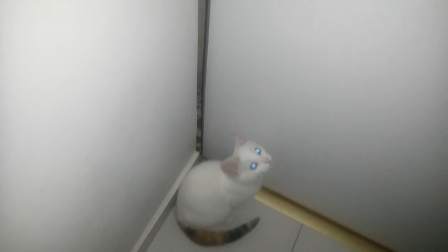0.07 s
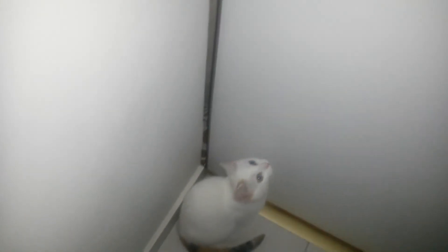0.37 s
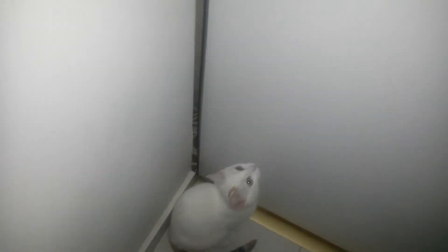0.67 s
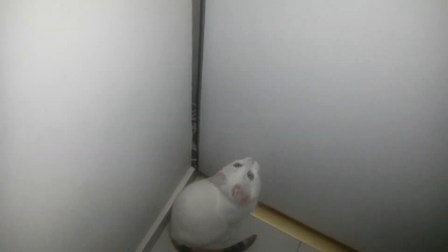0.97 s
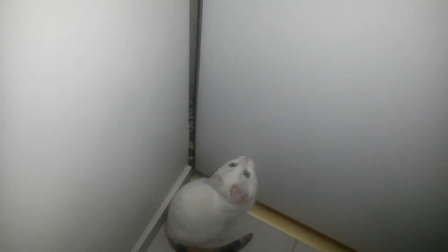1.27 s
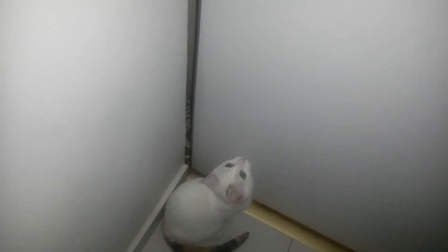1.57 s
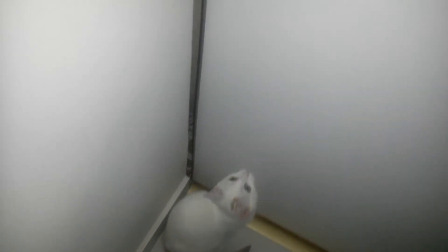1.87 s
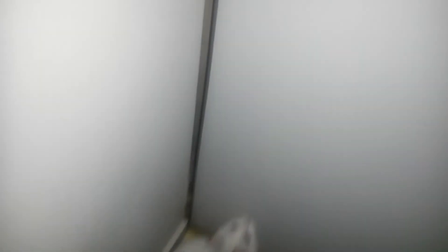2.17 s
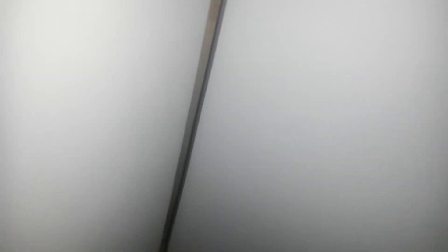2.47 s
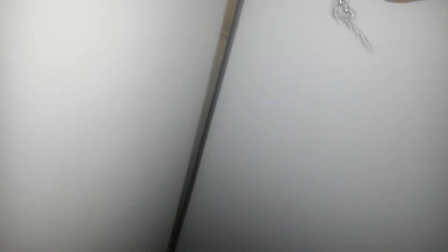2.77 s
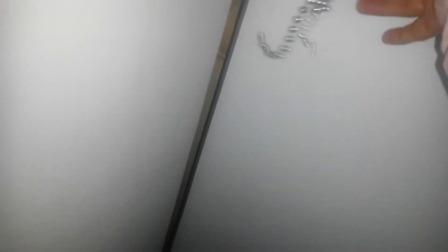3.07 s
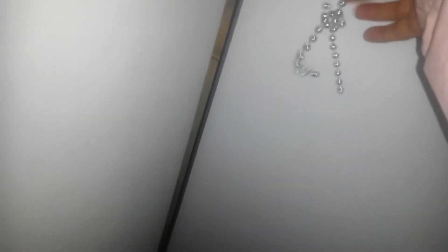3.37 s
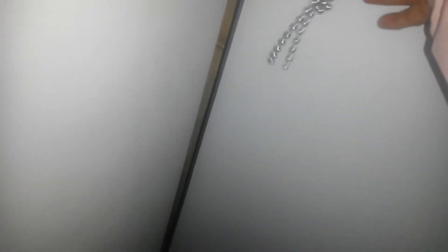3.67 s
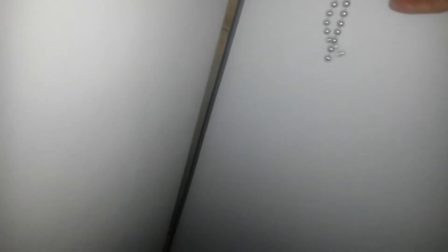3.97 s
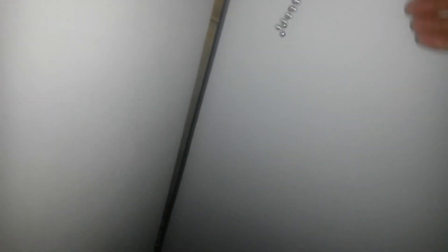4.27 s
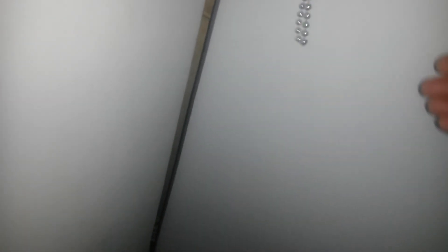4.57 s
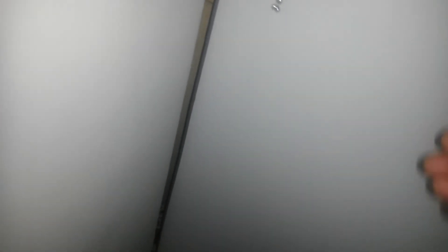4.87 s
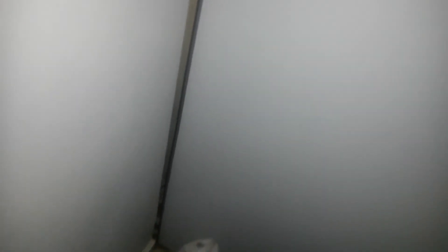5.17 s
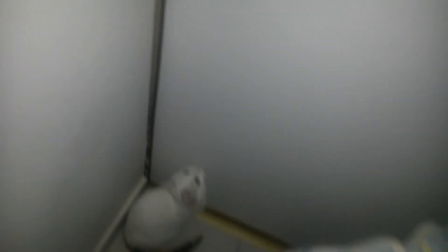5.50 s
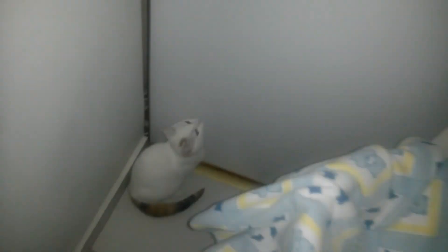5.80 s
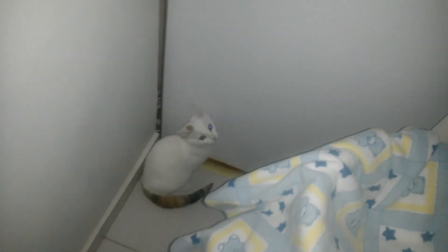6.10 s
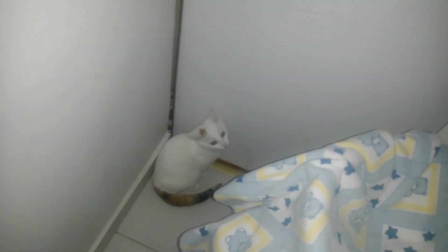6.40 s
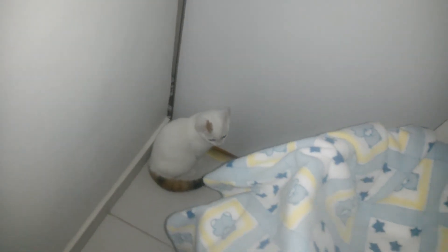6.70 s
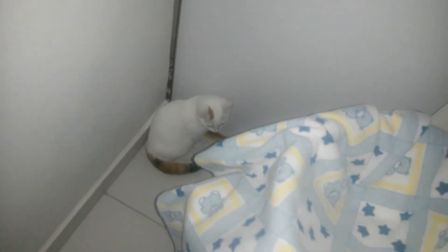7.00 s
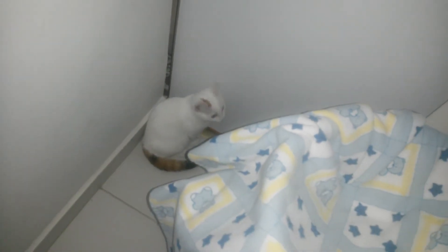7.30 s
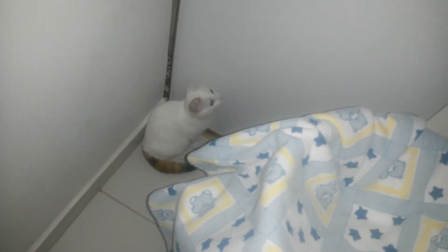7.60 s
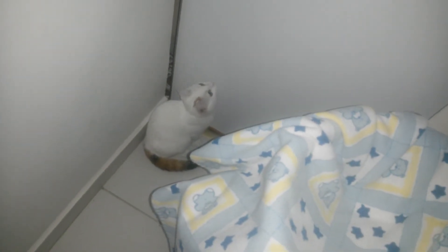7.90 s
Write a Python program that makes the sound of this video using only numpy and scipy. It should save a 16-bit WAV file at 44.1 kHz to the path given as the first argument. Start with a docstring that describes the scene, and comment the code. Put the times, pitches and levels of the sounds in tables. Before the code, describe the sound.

In a small room with hard walls, a brief rustle and a hand dragging on a door lead into sharp, irregular rattling of beads against the panel. Dull knocks make the hollow door shudder in its frame underneath the clatter. About halfway through, the rattling stops, leaving a few stray clicks, then soft fabric hiss and muffled handling bumps close to the phone microphone.

```python
"""Cloth rustles and thumps softly close to a phone, and a hand drags on and bumps a hollow door.
A dangling string of beads is flicked against the door in a small hard-walled room: each impact
excites the brief, high modes of the beads and the longer, lower modes of the panel. The beads click,
tumble and slide, then hang nearly still while friction makes the cloth hiss as the phone moves away."""
import sys
import numpy as np
from scipy import signal
from scipy.fft import rfft, irfft
from scipy.io import wavfile

SR = 44100
rng = np.random.default_rng(int(sys.argv[2]) if len(sys.argv) > 2 else 0)


def write(x):
    x = np.atleast_2d(x).T
    wavfile.write(sys.argv[1], SR, np.round(np.clip(x, -1, 1) * 32767).astype(np.int16))


N = 355005

# soft bumps of the hand on the door: t/s, thud level/dB, rattle level/dB
DOOR_BUMPS = [(.385, -20.5, -22), (.688, -7, -3.5), (.858, -24, -31), (1.014, -14, -3.5), (1.307, -16, -8),
              (1.508, -13, -5), (1.601, -13.5, -18.5), (1.725, -15.5, -27), (1.967, -16, -8.5),
              (2.148, -13, -5.5), (2.436, -5, -5), (2.6802, -2, 1), (2.862, -15, -4), (3.208, -7, -2),
              (3.397, -9.5, -1.5), (3.745, -17.5, -17)]
# spectrum of the rumble of fingers and door leaf: f/Hz, level/dB
RUMBLE_SPECTRUM = [(20, -20), (45, 0), (80, 2), (170, -5), (300, -15.5), (750, -18), (1500, -40),
                   (5000, -71)]


def undb(db):
    """Amplitude grows tenfold for every 20 dB."""
    return 10 ** (np.asarray(db) / 20)


def unit(x):
    """Normalisation: the energy of each channel becomes one."""
    return x / np.sqrt(np.sum(x ** 2, axis=-1, keepdims=True) + 1e-18)


def clock(seconds):
    """Uniform sampling: the sample times, t/s."""
    return np.arange(int(seconds * SR)) / SR


def curve(rows):
    """Linear interpolation between (t/s, value) rows."""
    return np.interp(np.arange(N) / SR, *np.transpose(rows))


def add(track, s, x):
    """Superposition: x joins the track at s seconds."""
    i = int(s * SR)
    track[..., i:i + x.shape[-1]] += x[..., :max(N - i, 0)]


def convolve(x, response):
    """A linear system convolves its input with its impulse response."""
    x, response = np.atleast_2d(x, response)
    return signal.oaconvolve(x.astype("float32"), response.astype("float32"), axes=-1)[:, :N]


def edge(x, hz, kind, order=2):
    """Maximally flat low-, high- or band-pass filtering."""
    return signal.lfilter(*signal.butter(order, hz, kind, fs=SR), x + 1e-18)


def colour(x, points, size=4096):
    """Minimum-phase filtering through (f/Hz, level/dB) points, by folding the cepstrum."""
    hz, db = np.transpose(points)
    f = np.maximum(np.arange(size // 2 + 1) * SR / size, 1)
    gain = undb(np.interp(np.log(f), np.log(hz), db))
    cepstrum = irfft(np.log(gain))
    cepstrum[1:size // 2] *= 2
    cepstrum[size // 2 + 1:] = 0
    return convolve(x, irfft(np.exp(rfft(cepstrum))))


def noise(points, apart_hz):
    """Stereo noise of rms one, coherent between the channels well below apart_hz."""
    mid, side = rng.standard_normal((2, N), dtype="float32")
    side = edge(side, apart_hz, "highpass", order=1)
    x = colour(np.array([mid + side, mid - side]), points)
    return x / x.std()


def damping(t, t60):
    """Exponential decay: the level falls 60 dB in t60 seconds."""
    return np.exp(-np.log(1000) * t / t60)


def cloth(flicker_db=1, grain_db=2.2):
    """Stick-slip friction: fibres catch and let go in a fine-grained hiss."""
    # first rub, faint steady hiss under the clatter of the beads, later rubs: t/s, level/dB
    first_rub = [(0.0, -51.5), (0.292, -45.5), (0.608, -56), (0.66, -56)]
    faint_hiss = [(.8, -60), (4.1, -62.5)]
    later_rubs = [
        [(4.58, -63), (4.768, -62), (4.968, -54.5), (5.738, -49), (5.866, -59.5), (6.234, -57), (6.312, -64.5),
         (6.42, -69.5)],
        [(6.5, -66), (6.59, -52), (6.65, -59), (6.832, -60), (6.892, -69.5), (6.996, -66.5), (7.734, -87.5),
         (8.05, -98)],
    ]
    # spectrum of the hiss: f/Hz, level/dB
    spectrum = [(60, -10.5), (150, 4.5), (450, 0.5), (1200, 0), (2500, 1), (5000, -3.5), (8000, -1.5),
                (14000, -2)]
    knots = np.linspace(0, N, 400)
    flicker = np.interp(np.arange(N), knots, rng.standard_normal(len(knots)))
    grain = undb(grain_db * rng.exponential(size=N))
    grain /= np.sqrt(np.mean(grain ** 2))
    level_db = curve(np.vstack([first_rub, faint_hiss, *later_rubs])) + flicker_db * flicker
    return noise(spectrum, apart_hz=700) * grain * undb(level_db)


def grip(gain_db=2):
    """Structure-borne sound: fingers shifting on the case rumble in both microphone ports."""
    # course of the rumble: t/s, relative level/dB
    shifts = [(0.0, -71.5), (0.76, -58), (1.55, -63), (1.73, -58), (2.44, -65), (2.64, -52.5),
              (3.11, -65.5), (3.47, -57), (3.76, -61), (4.08, -71.5), (4.69, -76), (5.11, -70),
              (7.04, -78.5), (8.05, -88.5)]
    return noise(RUMBLE_SPECTRUM, apart_hz=650) * undb(curve(shifts) + gain_db)


def air(level_db=-73):
    """Ambient noise: still room air gives a steady, faint floor."""
    # spectrum of the air: f/Hz, relative level/dB
    spectrum = [(20, 3.5), (80, 6.5), (200, -7.5), (600, -8.5), (1500, -13), (4000, -18), (8000, -22),
                (14000, -9.5)]
    return undb(level_db) * noise(spectrum, apart_hz=400)


def drag(gain_db=-1):
    """Forced vibration: skin rubbing on the panel keeps its low modes murmuring."""
    # drags of the hand: t/s, duration/s, relative level/dB
    drags = [(0, .35, -56), (.39, .36, -47), (.86, .06, -53), (1.2, .08, -50.5), (1.6, .15, -48)]
    # spectrum of the friction force: f/Hz, level/dB
    spectrum = [(40, -12.5), (98, 4.5), (160, -5), (270, 0), (420, -18), (750, -6), (1200, -32.5),
                (4000, -59.5)]
    murmur = door(noise(spectrum, apart_hz=900))
    return murmur / murmur.std() * undb(gain_db) * strokes(drags)


def strokes(rows, attack_s=.047, release_s=.035):
    """Friction envelope: each stroke rises linearly, holds and decays exponentially."""
    out, t = np.zeros(N), np.arange(N) / SR
    for s, length, db in rows:
        rise = np.clip((t - s) / attack_s, 0, 1)
        fall = np.exp(-np.clip((t - s - length) / release_s, 0, 20))
        out += undb(db) * rise * fall
    return out


def door(force):
    """Modal response: a force sets the panel ringing as a sum of damped sinusoids."""
    # panel modes: f/Hz, level/dB, t60/s
    modes = [(61.6, -24, 0.45), (95.6, -16.5, 0.31), (140.7, -15.5, 0.67), (160.6, -10.5, 0.58),
             (203, -12.5, 0.26), (250, -12, 0.075), (332, -8.5, 0.092), (364.7, -6.5, 0.18),
             (514.6, -15.5, 0.39), (648, -6.5, 0.058), (837, -8.5, 0.069), (975, -5.5, 0.028),
             (1082, -4.5, 0.15), (1283, 1.5, 0.17), (1400, 1, 0.015), (1503, 1, 0.076), (1678, -0.5, 0.043),
             (1865, 0, 0.033), (2047, -2.5, 0.092), (2356, 1.5, 0.076), (2775, -0.5, 0.063),
             (3250, 2, 0.049), (4220, 2, 0.039)]
    t = clock(.5)
    ring = sum((-1) ** k * undb(db) * np.sin(2 * np.pi * hz * t) * damping(t, t60)
               for k, (hz, db, t60) in enumerate(modes))
    return convolve(force, unit(ring))


def thumps(gain_db=-1):
    """Direct sound: fingers and cloth thump too close to the phone for the room to answer."""
    # muffled contacts: t/s, relative level/dB, band centre f/Hz, rise time/s
    touches = [(0.089, -13.5, 154, 0.012), (5.098, -30.5, 220, 0.0036), (5.101, -30.5, 980, 0.0024),
               (5.945, -31, 210, 0.0075), (6.448, -34, 240, 0.0028), (6.521, -29, 700, 0.0097),
               (6.865, -36, 110, 0.0086)]
    out, t = np.zeros(N), clock(.12)
    for s, db, hz, rise_s in touches:
        push = rng.standard_normal(len(t)) * t * np.exp(-t / rise_s)
        add(out, s, undb(db + gain_db) * unit(edge(push, [.52 * hz, 1.36 * hz], "bandpass")))
    return out


def bumps(thud_db=-3.5, body_db=-3, rattle_db=-2, rattle_lag_s=.003, contact_hz=660):
    """Soft impact: a low-passed pulse flexes the door, then the leaf rattles against its frame."""
    push, rattle, t = np.zeros(N), np.zeros((2, N)), clock(.03)
    impulse = 1. * (t == 0)
    pulse = unit(edge(edge(impulse, contact_hz, "lowpass"), 72, "highpass"))
    for s, push_db, frame_db in DOOR_BUMPS:
        add(push, s, undb(push_db) * pulse)
        chatter = edge(patter(.06, decay_s=.012, spread_db=3.5), [640, 1800], "bandpass")
        add(rattle, s + rattle_lag_s, undb(frame_db + rattle_db) * unit(chatter))
    body = door(push)
    body *= push.std() / body.std()
    return room(undb(thud_db) * push + undb(body_db) * body + rattle, tail_db=-6, ceiling_db=-10)


def patter(seconds, decay_s, spread_db):
    """A decaying random impulse train: tiny pulses of unequal size, independent at each port."""
    t = clock(seconds)
    size = undb(spread_db * np.minimum(rng.exponential(size=len(t)), 6))
    return unit(rng.standard_normal((2, len(t))) * size * np.exp(-t / decay_s))


def sway(gain_db=-49, slope=.42, decay_s=.13):
    """Free decay: the door leaf shudders after each bump, a little more after a harder one."""
    envelope, t = np.zeros(N), clock(.47)
    for s, push_db, _ in DOOR_BUMPS:
        add(envelope, s, undb(gain_db + slope * push_db) * np.exp(-t / decay_s))
    return noise(RUMBLE_SPECTRUM, apart_hz=650) * envelope


def room(x, tail_db, ceiling_db, ceiling_s=.0135, apart_hz=600):
    """Reverberation: direct sound, a ceiling reflection and a diffuse tail, longest in the bass."""
    # reverberation time: f/Hz, t60/s
    decay_times = [(100, 0.41), (500, 0.41), (1400, 0.26), (3700, 0.27), (9700, 0.19)]
    t = clock(.5)
    mid, side = rng.standard_normal((2, len(t)))
    side = edge(side, apart_hz, "highpass", order=1)
    spectrum = rfft(np.array([mid + side, mid - side]))
    log_f = np.log(np.maximum(np.linspace(0, SR / 2, spectrum.shape[1]), 1))
    hz, t60s = np.transpose(decay_times)
    bands = [np.interp(log_f, np.log(hz), peak) for peak in np.eye(len(hz))]
    tail = sum(irfft(spectrum * band, len(t)) * damping(t, t60) for band, t60 in zip(bands, t60s))
    response = undb(tail_db) * unit(tail * np.minimum(t / .0012, 1))
    add(response, ceiling_s, undb(ceiling_db) * patter(.01, decay_s=.0043, spread_db=7.5))
    response[:, 0] += 1  # direct path
    return convolve(x, response)


def beads(click_db=-5, tumble_db=-14.5, rebound_db=-24, panel_db=-19, panel_slope=.75, lag_s=.002013):
    """Hard impact: a bead clicks, its neighbours tumble and the panel answers lag_s later."""
    # bead strikes: t/s, relative click level/dB, relative tumble level/dB
    strikes = [(0.689, -11.5, -21.5), (.862, -20.5, -14.5), (.92, -19.5, -19), (0.9989, -22, -6),
               (1.05, -11, -20), (1.091, 1.5, 11), (1.157, -2, 7.5), (1.179, -14, 1), (1.259, -8, -17.5),
               (1.29, -4, 8.5), (1.372, 1.5, 17), (1.426, -7, -4), (1.485, -9, -15.5), (1.511, -4, -4),
               (1.561, -10, -5), (1.596, -13, 9), (1.616, -5, 9.5), (1.647, -16.5, 5.5), (1.712, -2, 3),
               (1.793, -11, 0), (1.837, -16.5, 2), (1.861, -13, 4), (1.8813, -5, -13), (1.922, -9.5, 2.5),
               (2.004, -16, -2), (2.0254, -16.5, 6.5), (2.042, -6, -12), (2.095, -12, -20), (2.155, -8, 3),
               (2.188, -15, 8.5), (2.212, -2, 6), (2.349, -7, -2), (2.515, -14, 7), (2.582, 4, 8.5),
               (2.665, -7, 4), (2.753, -6.5, -7.5), (2.797, 2.5, 2), (2.839, 3, 16.5), (2.909, 0.5, 9),
               (3.069, -23.5, -7), (3.153, -2.5, 7), (3.18, -11.5, 6.5), (3.283, -8.5, 12),
               (3.297, -1.5, 7), (3.3872, -0.5, 11.5), (3.41, -10.5, 7), (3.546, -13.5, -3.5),
               (3.649, -18, -2.5), (3.717, -8, 0.5), (3.7993, -4, 2), (3.839, -0.5, 5), (3.856, 2.5, 9),
               (3.952, -3.5, 7), (4.276, -26.5, -22), (4.48, -18.5, -6.5), (4.94, -20.5, -15.5),
               (5.387, -19, -15)]
    # coupling of the beads to the panel where they land: f/Hz, level/dB
    coupling = [(200, -23), (380, -13), (520, 2), (700, -7), (1075, -8.5), (1300, 1.5), (1900, 0.5),
                (2800, -2), (5000, 0)]
    # small hard beads radiate little bass: f/Hz, level/dB
    radiation = [(150, -9), (800, -4), (1400, 9.5), (2400, 3.5), (3500, 1), (7500, -1.5), (14000, 2.5)]
    clicks, taps = np.zeros((2, N)), np.zeros(N)
    for (s, hit_db, follow_db), click in zip(strikes, contacts(len(strikes))):
        strength_db = max(hit_db, follow_db)
        # the hardest blows put a larger share of their energy into the first click
        boost_db = np.interp(hit_db, [-4, 3], [0, 2.5])
        add(clicks, s, undb(hit_db + click_db + boost_db) * click)
        add(clicks, s + .0017, undb(follow_db + tumble_db) * tumble())
        add(clicks, s, undb(strength_db + rebound_db) * rebound())
        # every tap lands elsewhere on the panel and favours other modes
        tap = patter(.0087, decay_s=.0018, spread_db=2)[0]
        add(taps, s + lag_s, undb(panel_slope * strength_db + panel_db) * tap)
    clicks = colour(clicks + jiggle(), radiation)
    panel = door(colour(taps + soft_taps(), coupling))
    return room(clicks + panel + clinks(), tail_db=-3, ceiling_db=-6)


def contacts(count, t60_s=.0078, scatter=.084, crack_db=-3, crack_s=.0026):
    """Impulse excitation: each of count collisions gives a tiny crack and a heavily damped ring."""
    # bead modes, detuned at every contact: f/Hz, level/dB
    modes = [(3100, -5), (4350, -6.5), (5600, -1.5), (7300, -0.5), (8600, 0.5), (11200, 1), (13400, -3.5)]
    t = clock(.006)
    hz, db = np.transpose(modes)
    hz = hz * np.exp(scatter * rng.standard_normal((count, len(hz))))
    sizes = undb(db) * rng.choice([-1, 1], (count, 2, len(db)))  # polarity at each port
    phase = (2 * np.pi * hz[..., None] * t).astype("float32")
    ring = sizes @ np.sin(phase) * damping(t, t60_s)
    crack = rng.standard_normal(ring.shape) * np.exp(-t / crack_s)
    return unit(unit(ring) + undb(crack_db) * unit(crack))


def tumble(decay_s=.018, spread_db=2, count=11):
    """A collision chain: neighbouring beads meet in turn as their energy dies away."""
    out = np.zeros((2, int(.07 * SR)))
    lags = .055 * ((np.arange(count) + rng.random(count)) / count) ** 1.5
    sizes = undb(spread_db * rng.standard_normal(count)) * np.exp(-lags / decay_s)
    for lag, size, click in zip(lags, sizes, contacts(count)):
        add(out, lag, size * click)
    return unit(out)


def rebound(earliest_s=.025, latest_s=.075, count=2):
    """Rebound: the string swings back after a strike and ticks again."""
    out = np.zeros((2, int(.2 * SR)))
    for lag, click in zip(rng.uniform(earliest_s, latest_s, count), contacts(count)):
        add(out, lag, click)
    return unit(out)


def jiggle(start_s=1.0, end_s=2.15, tick_db=-14, spread_db=14, count=14):
    """Random collisions: single beads tick while the string swings."""
    out = np.zeros((2, N))
    for (place, weakness), click in zip(rng.random((count, 2)), contacts(count)):
        add(out, start_s + place * (end_s - start_s), undb(tick_db - spread_db * weakness) * click)
    return out


def clinks(ring_db=-7, bounce_s=.0064, count=3):
    """Free vibration: a few beads of nearly equal size land in turn, each ringing in four partials."""
    # bouncing groups: t/s, lowest f/Hz, t60/s, relative pitch spread, level/dB of each partial
    groups = [(1.156, 1400, 0.012, 0.024, -6.5, -3.5, -14.5, -6.5),
              (1.617, 1435, .022, .04, -3, -0.5, -14.5, 2),
              (2.187, 1446, 0.016, 0.032, -6.5, -10.5, -13.5, -4.5),
              (2.512, 1470, .036, .012, -7, -2.5, -18, -8),
              (2.751, 1495, .034, .026, -2.5, -7.5, -21.5, -6.5), (2.7995, 1820, 0.04, 0.032, 5, -1, 0, -9),
              (3.647, 1398, .022, 0.0031, -24.5, -18.5, -4, -10),
              (3.716, 1430, 0.039, 0.018, -6.5, -23.5, -9, -9)]
    # inharmonic partials of a bead: f as a multiple of the lowest
    ratios = [1, 2.93, 4.98, 7.7]
    out, t = np.zeros((2, N)), clock(.05)
    for s, hz, t60, spread, *levels in groups:
        group = np.zeros((2, int(.07 * SR)))
        for k, detune in enumerate(rng.standard_normal((count, len(ratios)))):
            pitches = hz * np.array(ratios) * (1 + spread * detune)
            partials = unit(np.sin(2 * np.pi * np.outer(pitches, t)) * damping(t, t60))
            sizes = undb(levels) * rng.choice([-1, 1], (2, len(levels)))
            lag = bounce_s * k * rng.uniform(.39, .87) / count
            add(group, lag, sizes @ partials / (1 + k))
        add(out, s, undb(ring_db) * np.linalg.norm(undb(levels)) * unit(group))
    return out


def slide(gain_db=-4, grain_db=3):
    """Sliding friction: beads passing over the paint give a grainy hiss."""
    # slides along the door: t/s, duration/s, relative level/dB
    slides = [(1.25, 0.42, -49), (1.82, 0.7, -49), (2.47, 0.56, -42), (3.3, 0.14, -34), (4.22, 0.32, -57.5)]
    # spectrum of the hiss: f/Hz, level/dB
    spectrum = [(200, -9), (1400, 0), (3000, -5.5), (7000, -2.5), (11000, 3.5), (14000, -0.5)]
    grain = undb(grain_db * np.minimum(rng.exponential(size=N), 7))
    grain /= np.sqrt(np.mean(grain ** 2))
    return noise(spectrum, apart_hz=700) * grain * undb(gain_db) * strokes(slides)


def soft_taps(cutoff_hz=1900):
    """Contact time limits bandwidth: a slow bead stays longer on the panel and drives its lower modes."""
    # taps without a click: t/s, relative level/dB
    taps = [(1.865, -19), (3.012, -21), (3.071, -20), (3.295, -6.5), (3.678, -13), (3.803, -11),
            (3.99, -17)]
    force = np.zeros(N)
    for s, db in taps:
        add(force, s, undb(db) * patter(.0087, decay_s=.0021, spread_db=3)[0])
    return edge(force, cutoff_hz, "lowpass")


def scene():
    """Superposition of beads, door, handling noise and room air."""
    handling = cloth() + thumps() + grip()
    return beads() + slide() + bumps() + sway() + drag() + handling + air()


def record(dry, top_hz=14500):
    """Port resonance: each microphone port lifts the treble at its own pitch; a low-pass cuts the top."""
    # response of the ports: f/Hz, left level/dB, right level/dB
    ports = [(2790, -1, 1), (4660, 4, 6), (5940, 6, 6.5), (6950, 11.5, 12), (7900, 9, 15.5),
             (8220, 4.5, 13), (8970, 2, 9), (10130, -2, 3.5), (11100, -5.5, 0.9), (14100, -9, -3.5)]
    wet = np.vstack([colour(dry[c], np.array(ports)[:, [0, c + 1]]) for c in range(2)])
    return signal.sosfilt(signal.ellip(8, .2, 70, top_hz, fs=SR, output="sos"), wet)


dry = scene()
out = record(dry)
write(out)
```